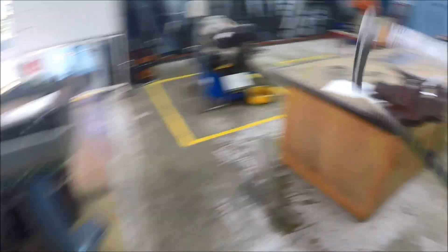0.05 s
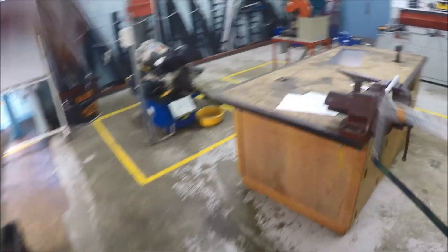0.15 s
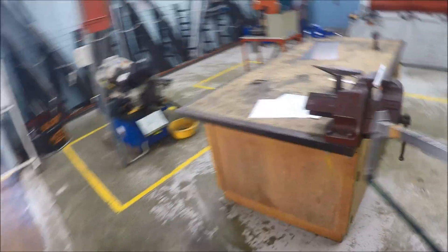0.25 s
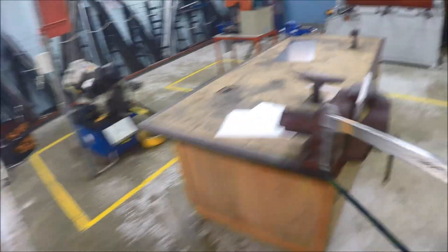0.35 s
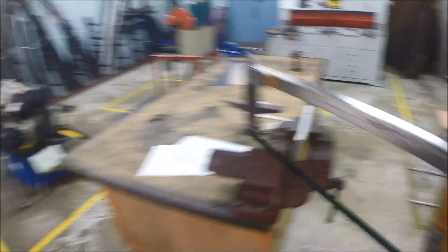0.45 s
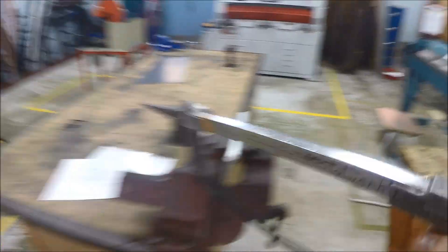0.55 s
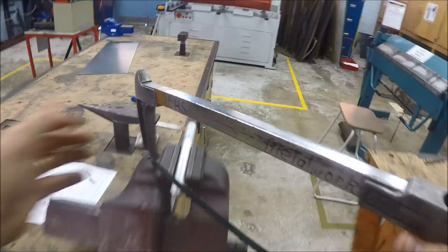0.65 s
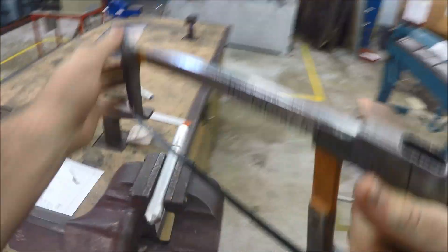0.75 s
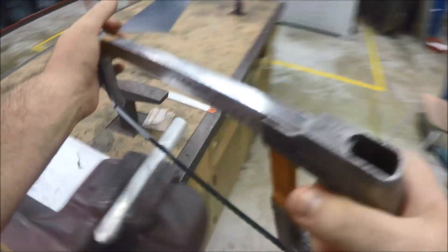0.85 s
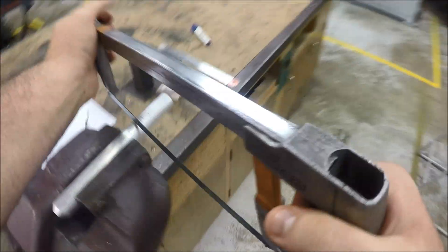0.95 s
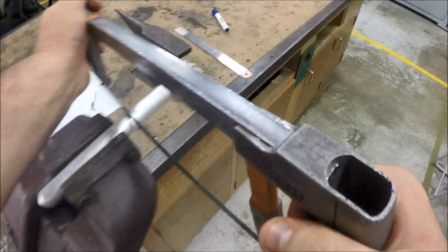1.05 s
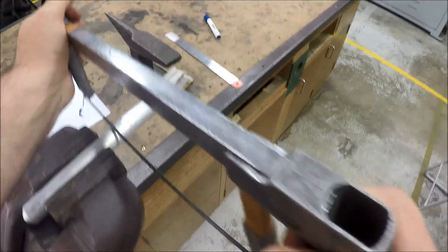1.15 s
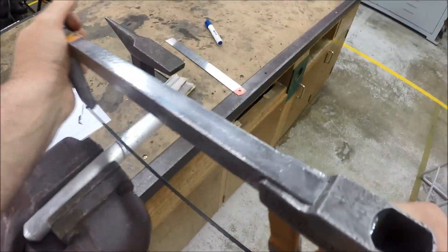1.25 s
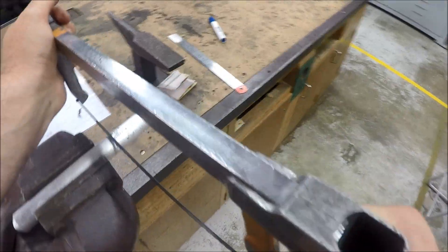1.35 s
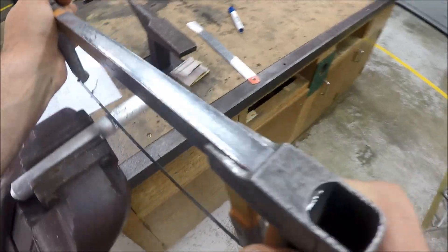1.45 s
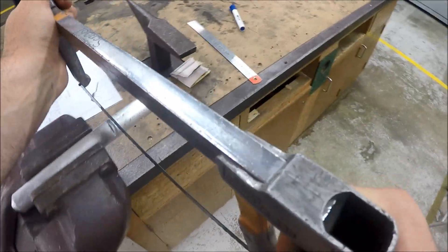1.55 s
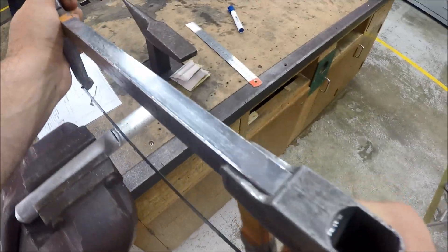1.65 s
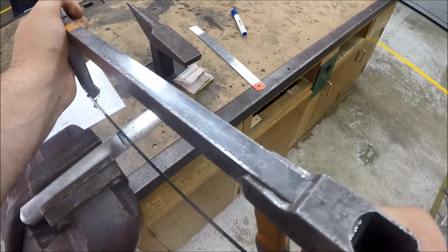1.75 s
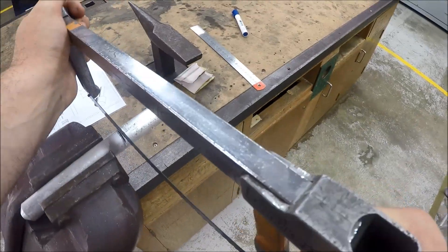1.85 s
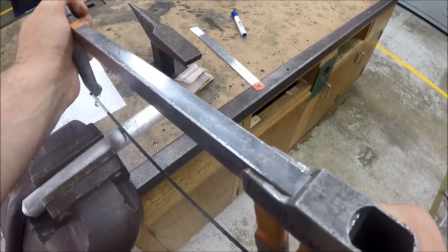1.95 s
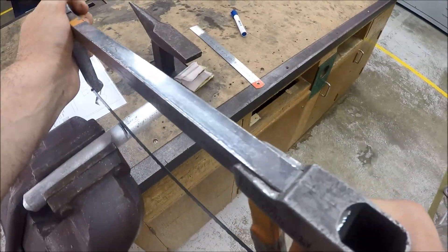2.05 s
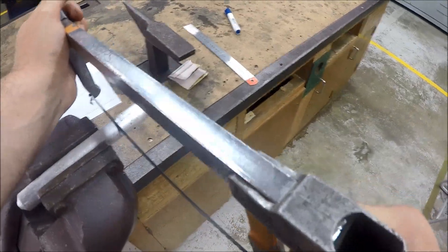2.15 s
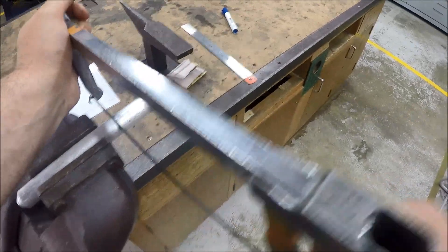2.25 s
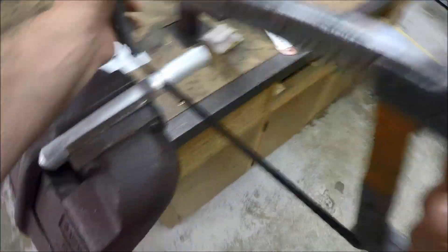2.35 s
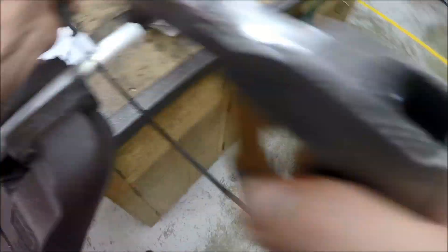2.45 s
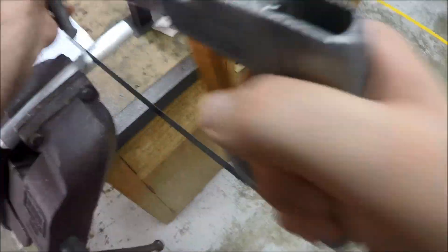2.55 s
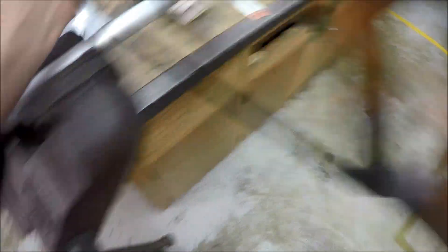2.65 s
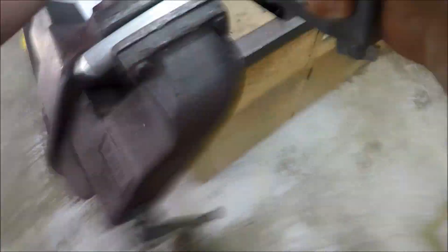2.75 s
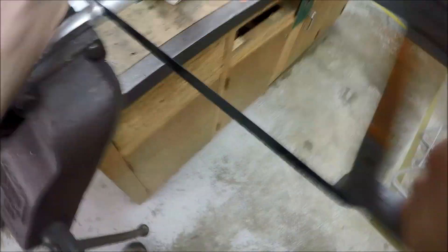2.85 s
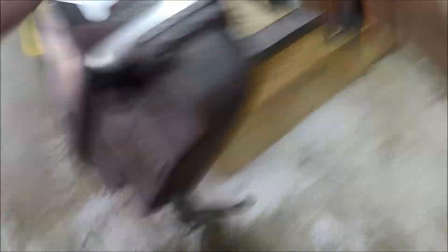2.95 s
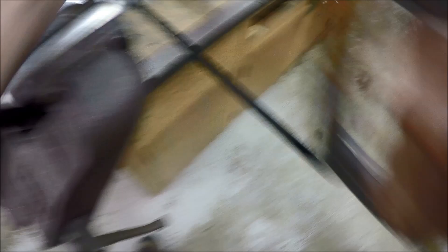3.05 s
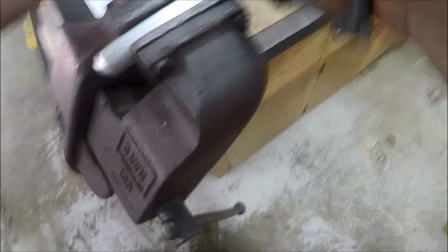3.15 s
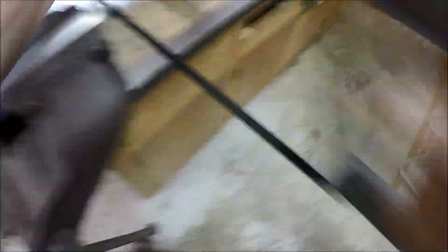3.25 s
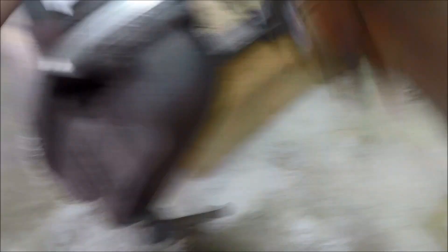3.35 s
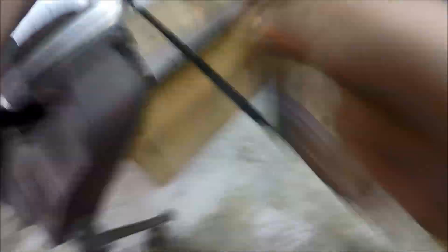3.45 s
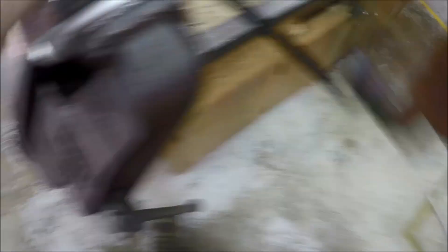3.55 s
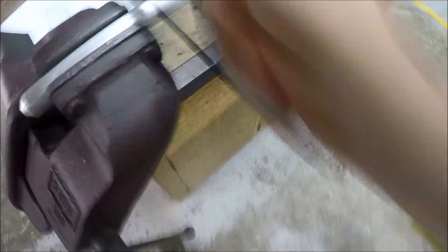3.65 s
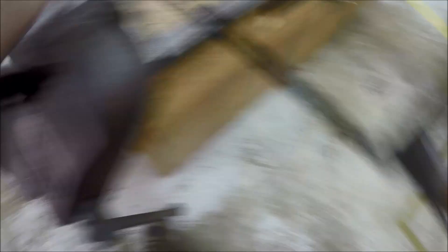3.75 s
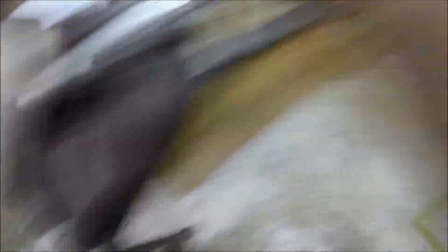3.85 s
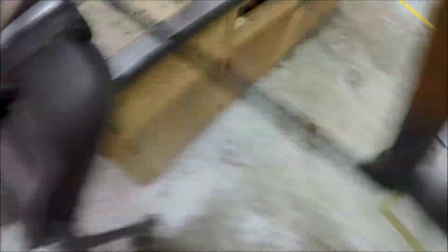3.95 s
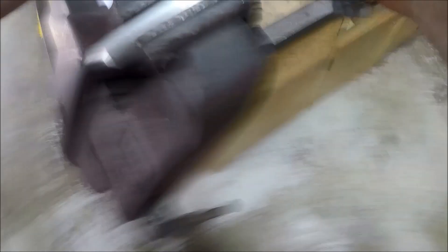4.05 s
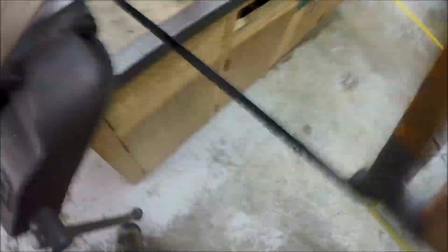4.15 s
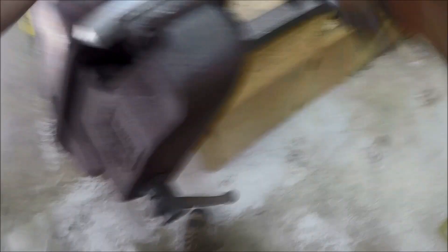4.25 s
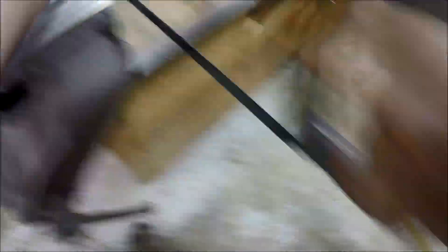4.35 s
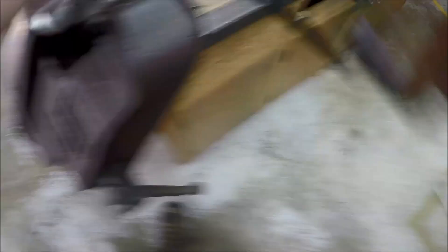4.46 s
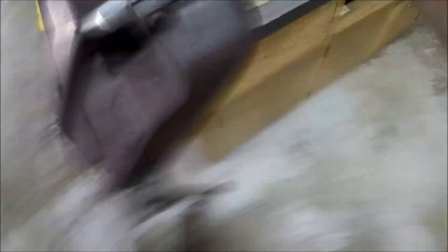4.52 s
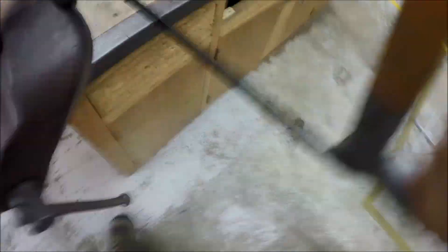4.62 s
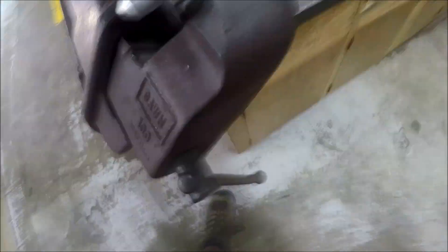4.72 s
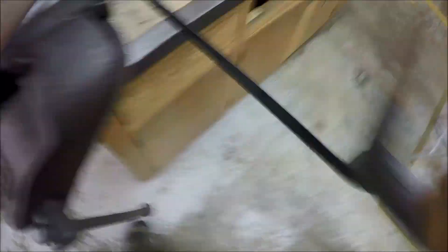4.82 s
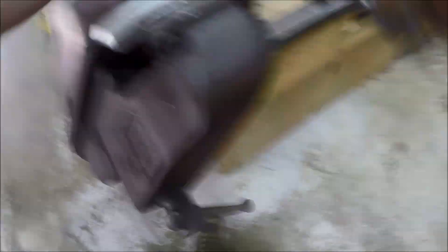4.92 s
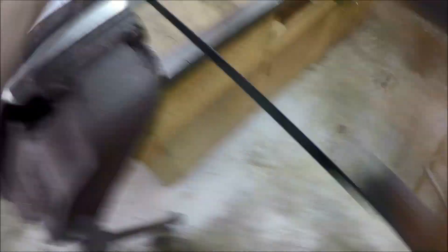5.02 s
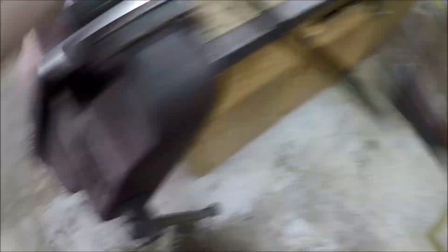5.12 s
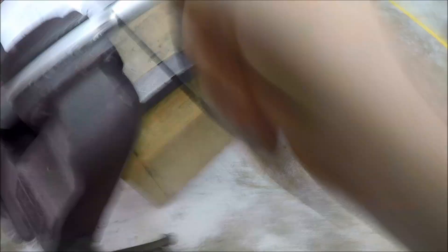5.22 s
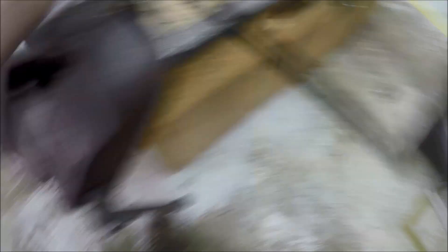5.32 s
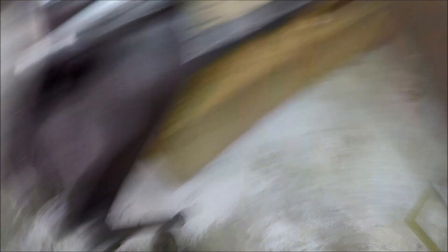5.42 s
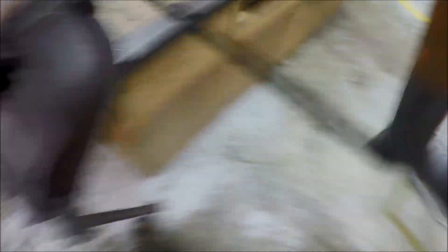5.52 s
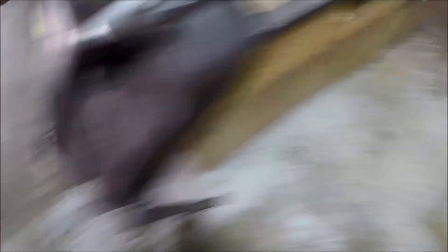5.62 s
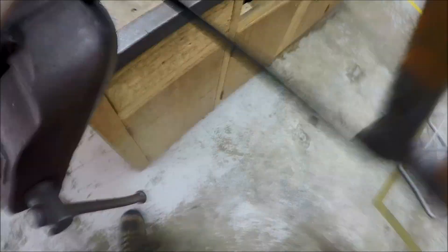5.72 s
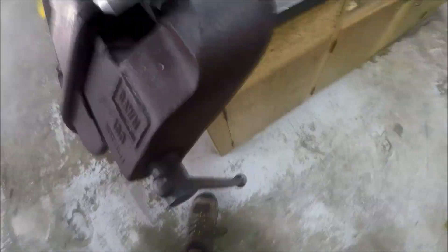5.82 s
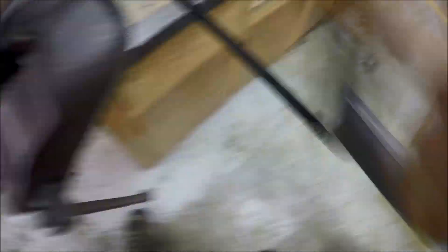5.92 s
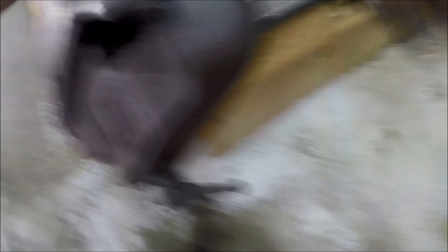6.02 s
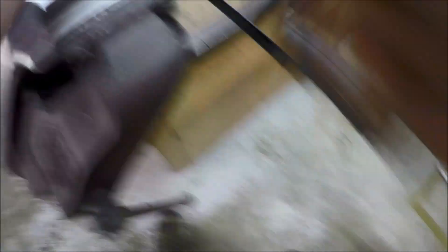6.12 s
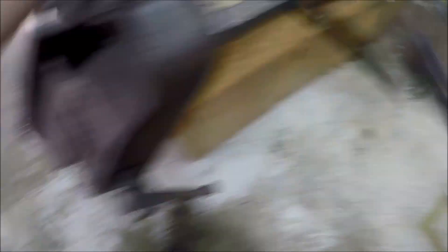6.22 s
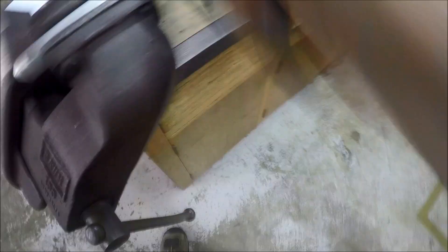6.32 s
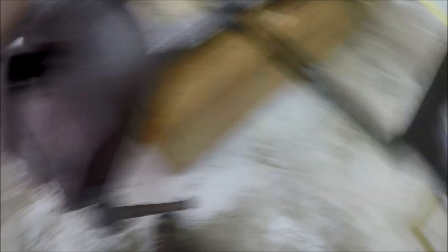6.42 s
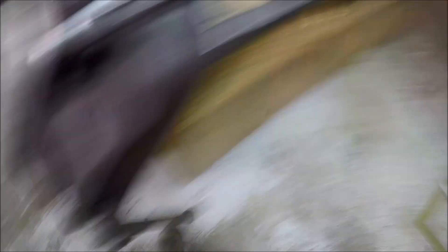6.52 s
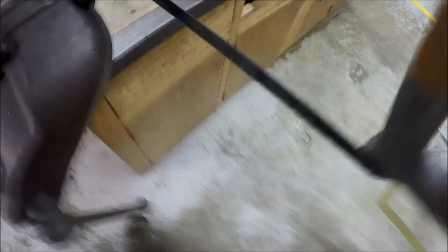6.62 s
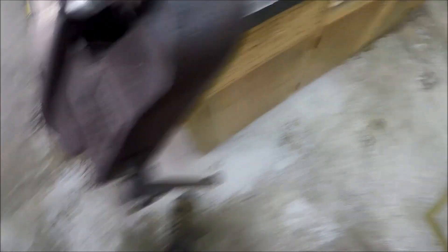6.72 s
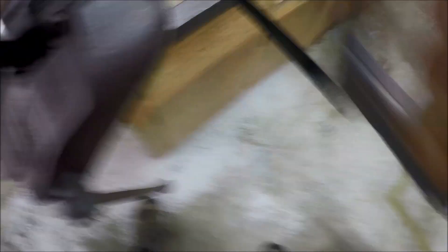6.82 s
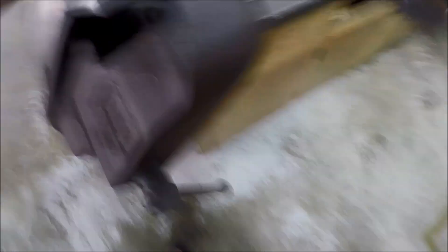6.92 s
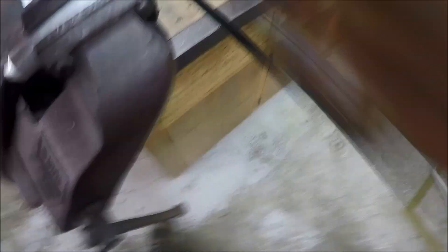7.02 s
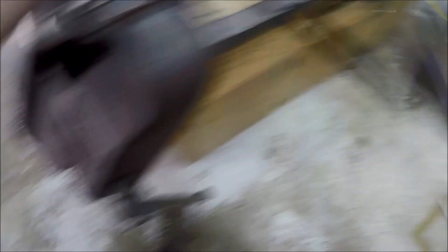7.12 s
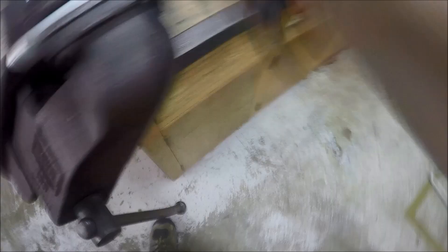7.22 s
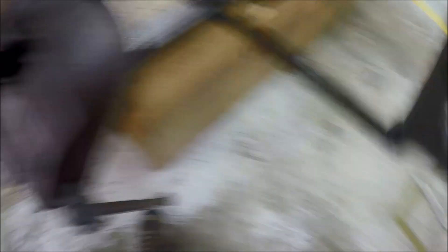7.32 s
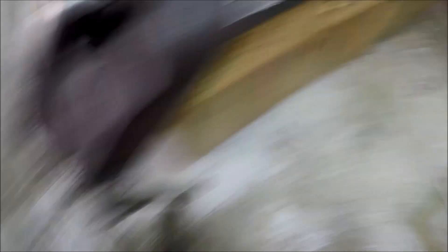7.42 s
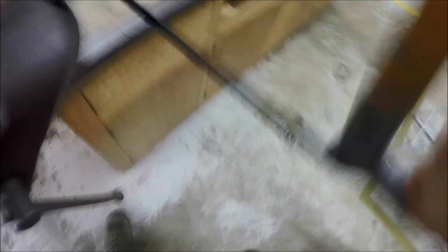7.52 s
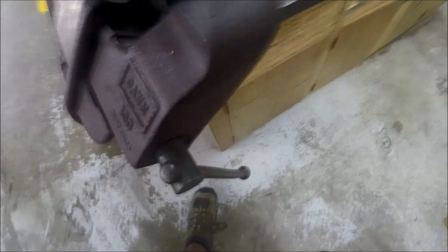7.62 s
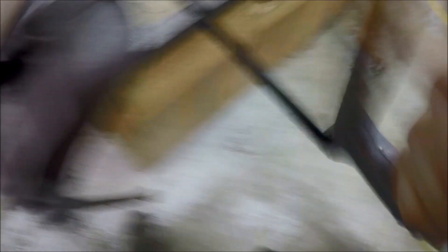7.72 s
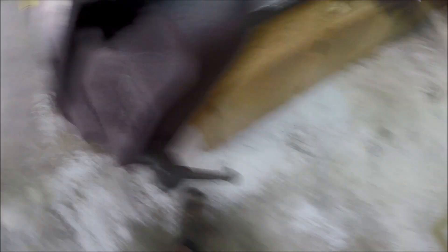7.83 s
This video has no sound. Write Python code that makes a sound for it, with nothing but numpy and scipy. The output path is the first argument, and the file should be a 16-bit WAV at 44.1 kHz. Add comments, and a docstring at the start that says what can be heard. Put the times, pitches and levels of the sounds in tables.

```python
"""In a quiet workshop a hacksaw is brought to an aluminium bar held in a vice, then driven to and fro,
nine strokes a second. Rasp, drag and chatter are filtered friction noise, squeaks and tooth tones shaped
by blade speed; gliding tones make the squeal. A case in its mount rides with the sawyer: it rubs and
ticks at first, then shifts, rocks, knocks and rebounds in every cycle, as noise bursts and damped sines.
Deep rumble, faint reflections and steady air noise lie behind."""
import sys
import numpy as np
from scipy import signal
from scipy.fft import rfft, irfft
from scipy.io import wavfile

SR = 44100
rng = np.random.default_rng(int(sys.argv[2]) if len(sys.argv) > 2 else 0)


def unload_audio(sound):
    """Save the sound as a 16-bit wav file, at the path given as the first command line argument."""
    columns = np.transpose(np.atleast_2d(sound))
    # keep every value between -1 and 1, then stretch to whole-number steps
    steps = np.round(np.clip(columns, -1, 1) * 32767)
    wavfile.write(sys.argv[1], SR, steps.astype(np.int16))


N = 347508
T = np.arange(N) / SR  # time_s

# One push and pull per row, timed by the knock at the far turn; relative levels:
# knock_s, thump_db, clack_db, rebound_delay_s, rebound_clack_db, rock_clack_db
TURNS = [(2.828, -7.5, -19, 0.023, -15, -31.5), (3.043, -10.5, -15, .023, -17.5, -25),
         (3.258, -10.5, -15, .023, -14, -29.5), (3.478, -8.5, -13, .021, -18, -25),
         (3.703, -12.5, -19.5, .022, -23.5, -26), (3.925, -11.5, -18, .024, -14, -25),
         (4.145, -11.5, -22, 0.018, -28, -24.5), (4.371, -11.5, -20.5, .023, -20, -25),
         (4.601, -9.5, -17.5, .022, -15.5, -29), (4.812, -12.5, -19.5, 0.018, -33, -28),
         (5.032, -9.5, -22, .027, -20, -23), (5.263, -8.5, -16.5, .031, -12.5, -22.5),
         (5.488, -11, -22, 0.016, -37, -28), (5.699, -15.5, -25.5, .031, -38, -24.5),
         (5.923, -10, -24.5, 0.029, -48, -23), (6.137, -12, -24.5, .019, -24.5, -32),
         (6.362, -13.5, -34.5, 0.02, -27.5, -32), (6.587, -10, -22.5, 0.02, -23, -23.5),
         (6.811, -18, -36, 0.021, -47, -32), (7.041, -10.5, -26, 0.023, -50, -40),
         (7.271, -12.5, -27.5, .022, -44, -32), (7.498, -15, -39, 0.023, -51, -23.5),
         (7.725, -9, -24, .021, -15.5, -22.5)]
# Resonances that colour the contacts: centre_hz, width_hz, lift_db
BODY = [(812, 174, -6.5), (1290, 910, 8.5), (2145, 436, 8.5), (4500, 816, 12.5), (5062, 750, 8),
        (7075, 290, 5), (12300, 270, 4), (13000, 600, -5), (15600, 400, -4)]
# Spectral densities before normalisation, each: frequency_hz, density_db
CUT_SPECTRUM = [(300, -1), (900, -31), (2000, -2.5), (3300, 2), (4500, -1), (6000, 3), (7500, 8.5),
                (9500, 3), (11000, 0), (13500, 5.5), (14700, -2), (16000, 0)]  # chips being cut
DRAG_SPECTRUM = [(150, -30), (450, 9), (800, -10), (1400, -2.5), (2500, 0.5), (3400, -0.5), (4700, 0.5),
                 (6000, -1), (9000, 0.5), (12000, -9.5), (16000, -46)]  # blade dragging in the slot
CLACK_SPECTRUM = [(200, -1.5), (500, 7.5), (1000, 3), (1700, -4), (2600, 2), (3800, -6.5), (5000, -23),
                  (9000, -49), (16000, -14)]  # hollow part of a knock, and blade chatter
TICK_SPECTRUM = [(500, 8), (2500, -15.5), (3900, 9.5), (4700, -4), (6200, 7), (9000, 2), (12000, -18),
                 (16000, -26)]  # sharp part of a knock
FRAME_SPECTRUM = [(600, -19), (1300, 2), (2250, 1.5), (3000, -18), (4000, 5), (7000, -43)]  # shiver of the saw frame
TAP_SPECTRUM = [(100, 3), (300, 13.5), (700, -9.5), (1300, -8), (2900, -8.5), (4000, 5.5), (4700, -10.5),
                (6200, -4.5), (9000, -8.5), (16000, -44)]  # blade set down on the bar
SNAG_SPECTRUM = [(1500, -6), (3000, -1), (4500, 2.5), (7000, 10.5), (9500, 4.5), (16000, -7)]  # a tooth catching and letting go
GROAN_SPECTRUM = [(100, -10.5), (320, 0.5), (500, -7), (800, -23), (1150, -4), (1600, -34.5), (4000, -43)]  # hollow of the grip
RUSTLE_SPECTRUM = [(300, 10), (800, -11), (1300, -1.5), (3200, 4.5), (4700, -1.5), (6000, 2.5),
                   (9500, -1.5), (12000, -6), (16000, -14)]  # fine rubbing of hands and case
RUB_SPECTRUM = [(40, -7.5), (110, 2.5), (280, 1), (400, -8), (700, -19), (1500, -69), (4000, -89)]  # dull rubbing and judder
RUMBLE_SPECTRUM = [(8, -21), (22, -3), (36, 2), (52, -3.5), (72, -1), (110, -21), (180, -29), (400, -62),
                   (1500, -71)]  # swaying of the case
AIR_SPECTRUM = [(59, -14), (100, -33), (119, -7), (202, -20), (328, -10), (358, -18), (801, -22),
                (2170, -22), (2800, -25), (3940, -33), (4570, -15), (5650, -28), (9610, -26), (15000, -35),
                (16000, -35)]  # quiet workshop
# Case ticks while the saw is brought into place, relative levels: start_s, thump_db, clack_db, tick_db
CASE_TICKS = [(0.029, -42, -30.5, -22.5), (0.063, -43, -34.5, -20), (0.138, -53, -38, -24),
              (0.736, -32, -41.5, -29), (0.773, -37, -49, -32), (0.796, -32, -43, -36.5),
              (0.87, -40, -45, -29), (0.898, -38, -42, -37), (1.06, -44.5, -46, -35.5),
              (1.102, -59, -58, -44), (1.256, -64, -52, -46), (1.328, -62, -57, -45),
              (2.496, -43, -37, -26)]
# Blade set down on the bar: start_s, level_db (over 10 ms)
TAPS = [(.643, -29), (1.5119, -30.5), (2.643, -26), (2.681, -25), (2.702, -20.5)]
# Ringing of the saw's steel at a tap: pitch_hz, relative_level_db, t60_s
STEEL = [(3640, 2, 0.21), (4020, 4, 0.062), (3920, 13, 0.079)]
# Snagging teeth: start_s, level_db (over 10 ms)
SNAGS = [(5.105, -15), (5.184, -21.5), (6.972, -27), (7.343, -17), (7.461, -18.5), (7.5729, -20.5),
         (7.679, -13)]
# Short creaks of the grip on the frame: start_s, length_s, scrape_db, groan_db
CREAKS = [(0.101, 0.025, -48, -36), (.29, 0.056, -42, -42), (0.411, 0.034, -46.5, -39),
          (0.485, .02, -58, -46), (.555, 0.029, -49, -42), (0.585, 0.046, -38, -34),
          (1.389, 0.033, -46.5, -48.5), (2.514, 0.031, -35, -36), (2.584, 0.026, -33.5, -36.5)]
# Rubbing of hands and case as the saw is carried and laid on the bar, before trims:
# time_s, rustle_db, rub_db
HANDLING = [(0.0, -44.5, -39), (0.13, -43.5, -43), (0.36, -50.5, -47), (0.54, -54, -51), (0.7, -51, -44.5),
            (0.78, -46, -37.5), (0.91, -45, -41.5), (1.08, -50.5, -53), (1.24, -58.5, -56),
            (1.45, -58, -57.5), (1.84, -66.5, -62.5), (1.95, -72, -65), (2.11, -66, -71), (2.23, -61, -54),
            (2.33, -56, -56)]
# Shaking of the case: time_s, rumble_db
SHAKE = [(0.0, -22.5), (0.15, -35.5), (2.06, -46.5), (2.83, -17), (2.98, -23.5), (7.81, -20), (7.88, -24)]
# Decay of the workshop's reflections: frequency_hz, t60_s
ROOM = [(200, 0.15), (2000, 0.68), (6000, 1), (15000, 0.34)]

AIR_DB = -63
TOOTH_HZ = 3706  # nominal rate of teeth crossing the bar at mid-stroke
EDGE_HZ = 15850  # upper band limit
FIRST_PUSH_S, LAST_PULL_END_S, LAST_PUSH_END_S = 2.698, 7.821, 7.94
CASE_LAG_S = .009  # from the blade's turn to the knock of the case on its mount
PUSH_SHARE = 0.49  # of each cycle
# the rasp grows as the slot deepens, and varies from stroke to stroke
RASP_DB, RASP_GROWTH_DB_PER_S, RASP_SPREAD_DB = -34.5, 0.52, 0.53
# a hard clack, its tick, and dB of tick for each dB of clack
HARD_DB, HARD_TICK_DB, TICK_SLOPE = -15.5, -17, 1.4
# thump of a hard rebound, and its dB for each dB of clack
REBOUND_THUMP_DB, REBOUND_THUMP_SLOPE = -11, 0.35
# the case shifts at mid-push, this long before the knock, and less so as the sawing steadies
SHIFT_S, SHIFT_SCATTER_S = .077, 0.00299
SHIFT_THUMP_DB, SHIFT_CLACK_DB, SETTLE_DB_PER_S = -19.5, -34, 3
# it rocks as the arm brakes, this long before the knock
ROCK_S, ROCK_SCATTER_S, ROCK_THUMP_OVER_CLACK_DB = .0415, .0015, 5
# the hands take a firm grip before the first push: sudden, then easing
GRIP_S, GRIP_ATTACK_S, GRIP_RUSTLE_DB, GRIP_RUB_DB, GRIP_EASE_DB_PER_S = 2.36, 0.043, -37, -32, 35


def gain_of(db):
    """Logarithmic level: decibels become an amplitude factor."""
    return 10 ** (np.asarray(db) / 20)


def evened(x):
    """Normalisation: scales a signal to unit RMS."""
    return x / np.sqrt(np.mean(x ** 2) + 1e-20)


def read(points, hz):
    """Interpolation: reads a table along a logarithmic frequency axis."""
    f, value = np.transpose(points)
    return np.interp(np.log(hz + 1), np.log(f + 1), value)


def add(mix, s, sound):
    """Superposition: mixes a sound in place, starting at time s."""
    part = mix[max(round(s * SR), 0):][:len(sound)]
    part += sound[:len(part)]


def wander(rate_hz, size=2 ** 15):
    """Low-pass random process: a smooth fluctuation of unit size."""
    t = np.linspace(0, T[-1], size)
    hz = np.fft.rfftfreq(size, t[1])
    spectrum = rfft(rng.standard_normal(size)) / (1 + (hz / rate_hz) ** 4)
    return np.interp(T, t, evened(irfft(spectrum)))


def response(points, lifts=(), size=2048):
    """Minimum phase: a causal impulse response from a spectrum with resonant lifts."""
    hz = abs(np.fft.fftfreq(size, 1 / SR))
    db = read(points, hz)
    db = db + sum(lift * 2 ** -(2 * (hz - f) / width) ** 2 for f, width, lift in lifts)
    log_gain = db * np.log(10) / 20
    # the Hilbert transform of the log gain supplies the phase
    return np.fft.ifft(np.exp(signal.hilbert(log_gain).conj())).real[:size // 2]


def colour(x, points, lifts=(), size=2048):
    """Linear filtering: convolution gives x a spectrum, then unit level."""
    return evened(signal.oaconvolve(x, response(points, lifts, size))[:N])


def grains(per_s, spread_db):
    """Random impulses: sparse clicks of either sign, most small and a few large."""
    sizes = gain_of(spread_db * np.minimum(rng.exponential(1, N), 4))
    signs = rng.choice([-1, 1], N)
    return evened(sizes * signs * (rng.random(N) < per_s / SR))


def burst(shape, decay_s, rattle=0.075, rattle_s=0.002, size=1200):
    """Impact excitation: a brief contact and dying rattle, with the energy of 10 ms at unit level."""
    t = np.arange(size) / SR
    decay = np.exp(-t / decay_s) + rattle * decay_s / 0.0044 * np.exp(-t / rattle_s)
    contact = (1 - np.exp(-t / 0.00099)) * decay
    sound = signal.fftconvolve(rng.standard_normal(size) * contact, shape)
    return sound * np.sqrt(SR / 100 / np.sum(sound ** 2))


def thump(hz, sway_hz=110, sway=0.43, decay_s=0.0039, sway_decay_s=0.0062, size=3000):
    """Damped oscillation: the mount bounces briefly over a slower sway."""
    t = np.arange(size) / SR
    bounce = np.sin(2 * np.pi * hz * t) * np.exp(-t / decay_s)
    slow = sway * np.sin(2 * np.pi * sway_hz * t) * np.exp(-t / sway_decay_s)
    sound = (slow - bounce) * (1 - np.exp(-t / 0.001))
    return sound * np.sqrt(SR / 100 / np.sum(sound ** 2))  # energy of 10 ms at unit level


def saw(cut_db=2.5, drag_db=-2.0, pull_drag_db=1, judder_db=0.0, chatter_db=-2):
    """Friction noise: chips hiss and squeak at speed, the blade drags, and chatters about the far turn."""
    progress, force, stroke = blade()
    speed, pull = np.sin(np.pi * progress), stroke % 2
    bite = teeth(speed, stroke)

    chips = .52 * bite + .4 * squeaks(900, 3200, 15000) + .7 * grains(16000, 2)
    cut = colour(chips * gain_of(2.56 * wander(430)), CUT_SPECTRUM, BODY)
    cut = cut * speed ** 1.45 * gain_of(cut_db)

    catches = .3 * bite + .22 * squeaks(500, 1200, 8500) + .9 * grains(6500, 3)
    drag = colour(catches * gain_of(2.3 * wander(70)), DRAG_SPECTRUM, BODY)
    drag = drag * (0.68 + 0.71 * speed) * gain_of(drag_db + pull_drag_db * pull)

    # the blade bends and chatters on either side of the far turn
    from_turn = progress + pull - 1
    slips = colour(grains(3000, 3) + .6 * squeaks(260, 1800, 4300), CLACK_SPECTRUM, BODY)
    slips = slips * evened(gain_of(9 * np.tanh(wander(65))))
    near_turn = np.exp(-(from_turn / 0.43) ** 2)
    chatter = slips * near_turn * (0.19 + 1.95 * speed) * gain_of(chatter_db)

    # the uneven bite shakes the frame and the arms
    judder = colour(grains(400, 5.7), RUB_SPECTRUM) * gain_of(judder_db + 3.8 * np.tanh(wander(31)))
    return force * (cut + drag + chatter + judder + squeal(progress, stroke))


def blade():
    """Reciprocating motion: progress (0 to 1), force and number of each stroke; even ones are pushes."""
    far = np.array(TURNS)[:, 0] - CASE_LAG_S
    near = far[1:] - PUSH_SHARE * np.diff(far)
    starts = np.sort(np.r_[FIRST_PUSH_S, far, near, LAST_PULL_END_S, LAST_PUSH_END_S])
    place = np.interp(T, starts, np.arange(len(starts)))
    stroke = place.astype(int)
    spread_db = RASP_SPREAD_DB * rng.standard_normal(len(starts))[stroke]
    db = RASP_DB + RASP_GROWTH_DB_PER_S * (T - FIRST_PUSH_S) + spread_db
    return place % 1, gain_of(db) * (T > FIRST_PUSH_S), stroke


def teeth(speed, stroke):
    """Periodic excitation: tooth rate and its harmonics arch with each stroke, at a random pace."""
    pace = 1 + .04 * rng.standard_normal(stroke.max() + 1)[stroke]
    tooth_hz = TOOTH_HZ * pace * speed ** .4 * (1 + .014 * wander(350))
    turns = np.cumsum(tooth_hz) / SR
    tone = np.zeros(N)
    for k in range(1, 7):
        in_band = k * tooth_hz < EDGE_HZ
        tone += np.cos(2 * np.pi * k * turns) * in_band * gain_of(2 * wander(40))
    return evened(tone)


def squeaks(per_s, low_hz, high_hz, spread_db=5.5):
    """Stick-slip: patches of the blade sound for hundredths of a second, each on a gliding pitch."""
    out = np.zeros(N)
    for when, pitch, length, glide, luck in rng.random((int(per_s * T[-1]), 5)):
        u = np.linspace(0, 1, int(SR * (.01 + .022 * length)))
        hz = (low_hz + (high_hz - low_hz) * pitch) * (1 + .14 * (glide - .5) * u)
        size = gain_of(spread_db * min(-np.log(1 - luck), 3))
        tone = np.sin(2 * np.pi * np.cumsum(hz) / SR)
        add(out, when * T[-1], size * np.sin(np.pi * u) ** 2 * tone)
    return evened(out)


def squeal(progress, stroke, start_hz=8200, end_hz=6700, squeal_db=0.0, growth_db=2.4):
    """Self-excited vibration: each push sings raggedly, falling in pitch, louder as the slot deepens."""
    hz = start_hz + (end_hz - start_hz) * np.sqrt(progress) + 230 * wander(500) + 170 * wander(35)
    ragged = gain_of(4 * wander(40)) * np.sin(np.pi * progress)
    growth = gain_of(squeal_db + growth_db * (T - T[-1]))  # growth_db is per second
    return np.sin(2 * np.pi * np.cumsum(hz) / SR) * ragged * growth * (stroke % 2 == 0)


def buzzes(buzz_db=-30, delay_s=0.021, rise_s=0.0033):
    """Loose-joint vibration: as the pull takes up slack, the blade clatters on its pins; the frame buzzes."""
    swell, t = np.zeros(N), np.arange(SR // 10) / SR
    for (s, *_), chance in zip(TURNS, rng.standard_normal(len(TURNS))):
        pulse = t / rise_s * np.exp(1 - t / rise_s)
        add(swell, s + delay_s, gain_of(buzz_db + 2.9 * chance) * pulse)
    return swell * colour(grains(900, 5.2), FRAME_SPECTRUM, BODY)


def blows():
    """Inertia: each cycle the case shifts, rocks, knocks and rebounds, brighter when harder.

    Columns: start_s, thump_db, clack_db, tick_db."""
    rows = []
    chances = rng.standard_normal((len(TURNS), 2))
    for (s, low, mid, after_s, rebound, rock), chance in zip(TURNS, chances):
        settled = SETTLE_DB_PER_S * (s - FIRST_PUSH_S)
        shift_s = s - SHIFT_S + SHIFT_SCATTER_S * chance[0]
        rock_s = s - ROCK_S + ROCK_SCATTER_S * chance[1]
        rebound_thump = REBOUND_THUMP_DB + REBOUND_THUMP_SLOPE * (rebound - HARD_DB)
        rows += [(shift_s, SHIFT_THUMP_DB - settled, SHIFT_CLACK_DB - settled),
                 (rock_s, rock + ROCK_THUMP_OVER_CLACK_DB, rock),
                 (s, low, mid),
                 (s + after_s, rebound_thump, rebound)]
    return [(s, low, mid, HARD_TICK_DB + TICK_SLOPE * (mid - HARD_DB)) for s, low, mid in rows]


def knocks(hits, thump_db=2.0, clack_db=0, tick_db=-5.0, shiver_db=-9, thump_hz=245):
    """Impact: the case meets its mount with tick, hollow clack and thump; the saw frame shivers."""
    out = np.zeros(N)
    clack, tick = response(CLACK_SPECTRUM, BODY), response(TICK_SPECTRUM, BODY)
    frame = response(FRAME_SPECTRUM, BODY)
    for (s, low, mid, high), chance in zip(hits, 2 * rng.random((len(hits), 3)) - 1):
        add(out, s + 0.00094, gain_of(low + thump_db) * thump(thump_hz * (1 + 0.3 * chance[0])))
        add(out, s, gain_of(mid + clack_db) * burst(clack, 0.0018 * (1 + 0.077 * chance[1])))
        add(out, s, gain_of(high + tick_db) * burst(tick, 0.0011))
        add(out, s, gain_of(mid + shiver_db + 2.1 * chance[2]) * burst(frame, 0.0019))
    return out


def rattles(hits, rattle_db=-14, bump_db=-11, soonest_s=.004, spread_s=.008):
    """Secondary impact: soon after each knock the loose case gives a smaller, stray one."""
    out, shape = np.zeros(N), response(CLACK_SPECTRUM, BODY) + response(FRAME_SPECTRUM, BODY)
    for (s, low, mid, _), gap in zip(hits, rng.random(len(hits))):
        when = s + soonest_s + spread_s * gap
        add(out, when, gain_of(mid + rattle_db) * burst(shape, 0.00074))
        add(out, when, gain_of(low + bump_db) * thump(253))
    return out


def heaves(heave_db=-3, heave_hz=62, decay_s=0.034):
    """Damped resonance: each far turn jolts the whole case into a short, deep wobble of random pitch."""
    out, t = np.zeros(N), np.arange(SR // 10) / SR
    for (s, low, *_), chance in zip(TURNS, rng.uniform(-1.2, 1, len(TURNS))):
        wobble = np.sin(2 * np.pi * heave_hz * (1 + 0.6 * chance) * t) * np.exp(-t / decay_s)
        add(out, s, gain_of(low + heave_db) * wobble)
    return out


def clinks(ring_db=-22):
    """Modal ringing: the blade taps the bar and rings briefly; snagging teeth let go with a bright snap."""
    out, t = np.zeros(N), np.arange(SR // 3) / SR
    ring = sum(gain_of(db - 60 * t / t60) * np.sin(2 * np.pi * hz * t) for hz, db, t60 in STEEL)
    for s, db in TAPS:
        add(out, s, gain_of(db) * burst(response(TAP_SPECTRUM, BODY), 0.00064))
        add(out, s, gain_of(db + ring_db) * ring)
    for s, db in SNAGS:
        add(out, s, gain_of(db) * burst(response(SNAG_SPECTRUM, BODY), 0.0014))
    return out


def creaks():
    """Stick-slip: the grip slips on the frame in a short, hollow scrape."""
    out, slips = np.zeros(N), grains(2300, 4.7)
    scrape = evened(colour(slips, DRAG_SPECTRUM, BODY) + .5 * colour(slips, FRAME_SPECTRUM, BODY))
    groan = colour(slips, GROAN_SPECTRUM)
    for s, length_s, scrape_db, groan_db in CREAKS:
        swell = np.sqrt(np.hanning(int(length_s * SR)))
        part = slice(int(s * SR), int(s * SR) + len(swell))
        add(out, s, swell * (gain_of(scrape_db) * scrape[part] + gain_of(groan_db) * groan[part]))
    return out


def handling(rustle_db=2, rub_db=1, release_s=0.04):
    """Sliding friction: fine grains and a dull rub as the saw is brought into place and gripped."""
    s, high, low = np.transpose(HANDLING)
    held_s = np.maximum(T - GRIP_S, 0)
    grip = np.minimum(held_s / GRIP_ATTACK_S, 1) * gain_of(-GRIP_EASE_DB_PER_S * held_s)
    rustle_level = gain_of(np.interp(T, s, high) + rustle_db) + gain_of(GRIP_RUSTLE_DB) * grip
    rub_level = gain_of(np.interp(T, s, low) + rub_db) + gain_of(GRIP_RUB_DB) * grip
    rustle = colour(grains(6000, 4.4) * gain_of(3.0 * wander(32)), RUSTLE_SPECTRUM, BODY)
    rub = colour(grains(1100, 6.0), RUB_SPECTRUM)
    release = np.interp(T, [FIRST_PUSH_S, FIRST_PUSH_S + release_s], [1, 0])
    return (rustle * rustle_level + rub * rub_level) * release


def rumble(rumble_db=0, lumps_db=4.0):
    """Low-frequency vibration: the swaying case picks up deep, lumpy noise."""
    s, db = np.transpose(SHAKE)
    lumps = evened(gain_of(lumps_db * wander(19.3)))
    deep = colour(rng.standard_normal(N), RUMBLE_SPECTRUM, size=16384)
    return deep * lumps * gain_of(np.interp(T, s, db) + rumble_db)


def workshop(x):
    """Reverberation: sparse reflections, each band decaying at its own rate."""
    after_gap = np.arange(SR) > .006 * SR
    taps = rng.choice([-1., 1.], SR) * (rng.random(SR) < 2500 / SR) * after_gap
    hz, t, z = signal.stft(taps, SR, nperseg=256)
    decay = gain_of(-60 * t / read(ROOM, hz)[:, None])
    tail = signal.istft(z * decay, SR, nperseg=256)[1]
    return signal.fftconvolve(x, tail / np.linalg.norm(tail))[:N]


def room_air():
    """Stationary noise: the quiet workshop as steady filtered noise."""
    return gain_of(AIR_DB) * colour(rng.standard_normal(N), AIR_SPECTRUM)


def scene(saw_room_db=-16, near_room_db=-25):
    """Superposition: saw and case dominate; the workshop answers faintly."""
    hits = CASE_TICKS + blows()
    sawing = saw() + buzzes()
    near = knocks(hits) + rattles(hits) + clinks() + creaks() + handling()
    room = workshop(gain_of(saw_room_db) * sawing + gain_of(near_room_db) * near)
    return (sawing + near + room + heaves() + rumble() + room_air())[None]


def record(dry):
    """Saturation: the hardest knocks overload softly; a low-pass filter then limits the band."""
    squashed = dry / (1 + dry ** 6) ** (1 / 6)
    low_pass = signal.firwin(401, EDGE_HZ, window=("kaiser", 8), fs=SR)
    return signal.oaconvolve(squashed, low_pass[None], "same")


dry = scene()
out = record(dry)
unload_audio(out)
```